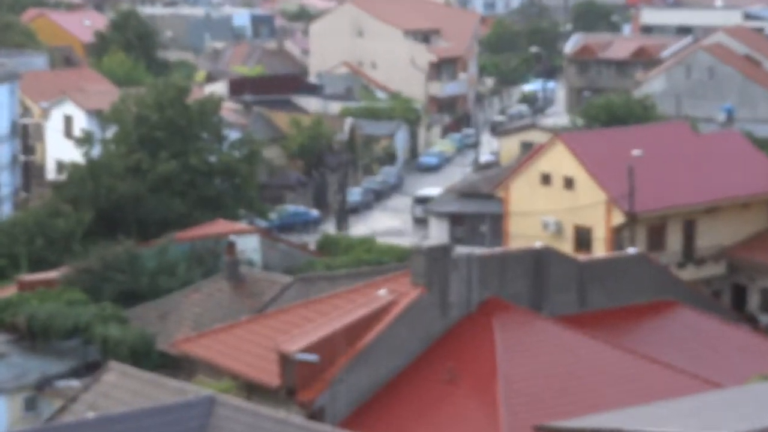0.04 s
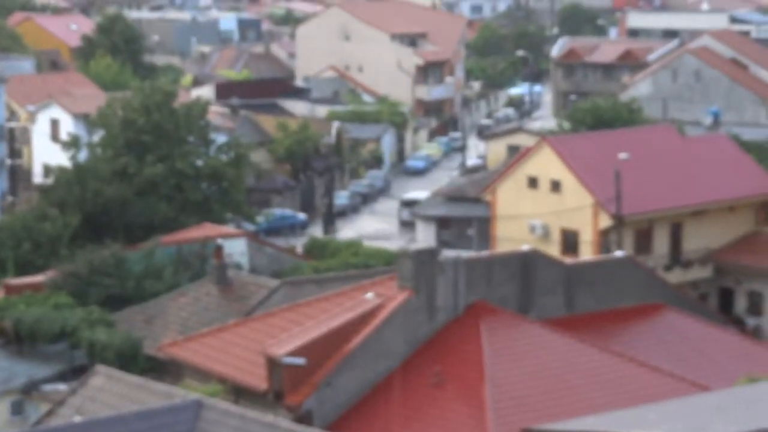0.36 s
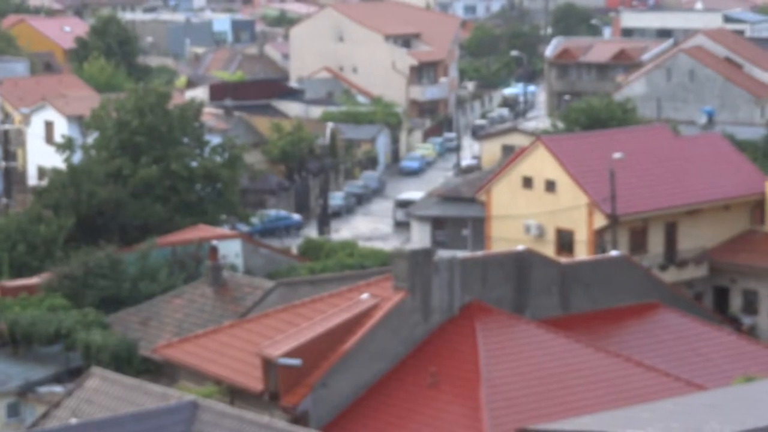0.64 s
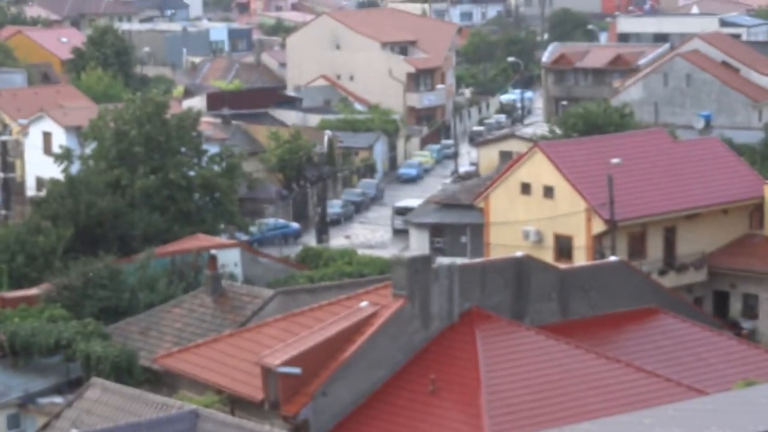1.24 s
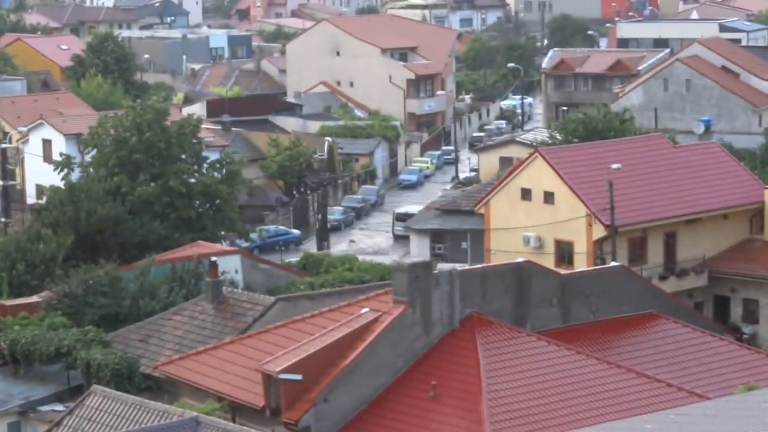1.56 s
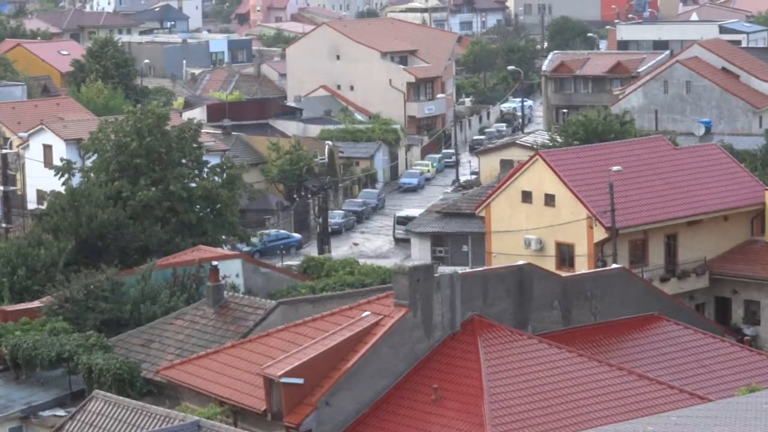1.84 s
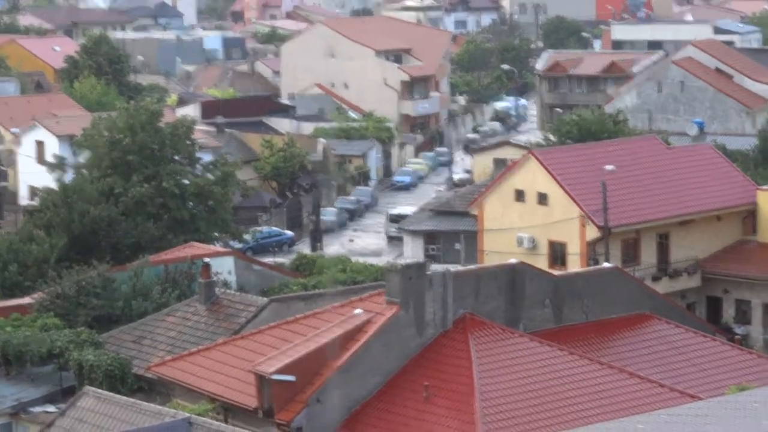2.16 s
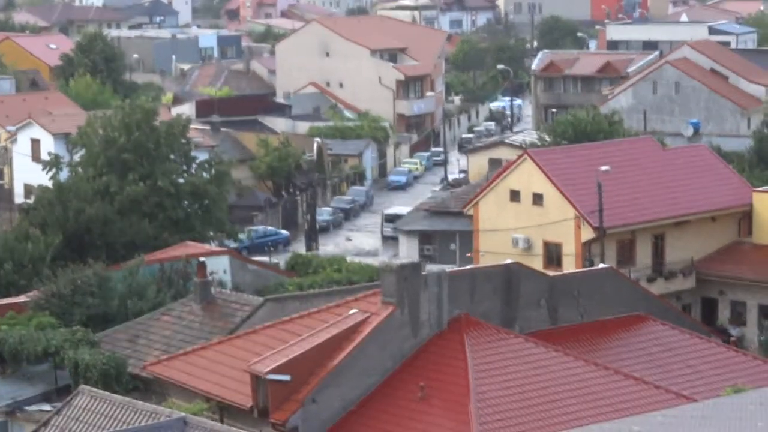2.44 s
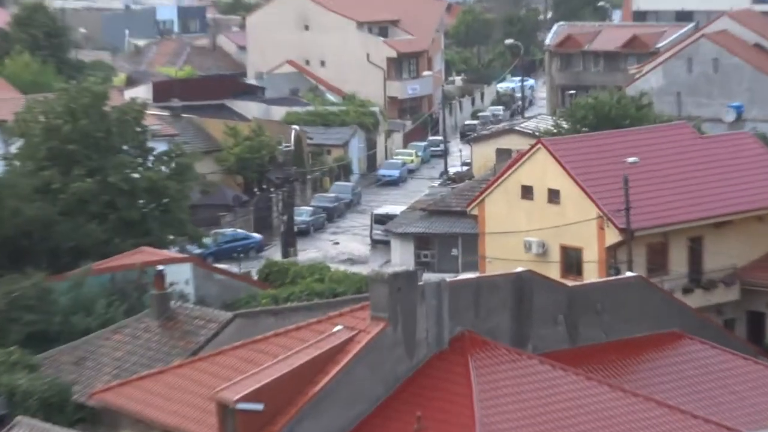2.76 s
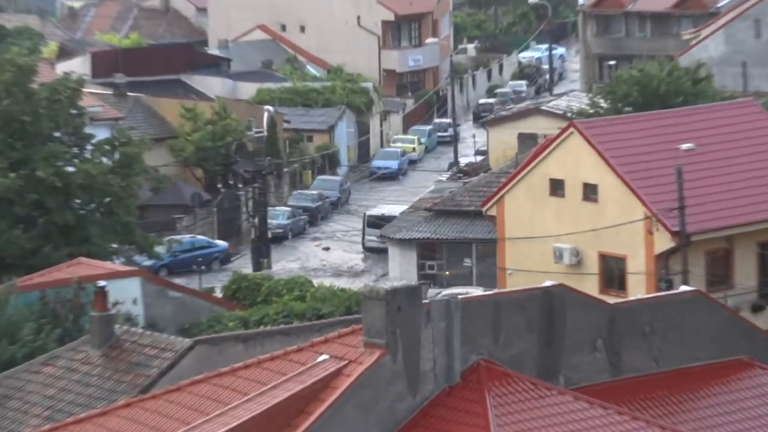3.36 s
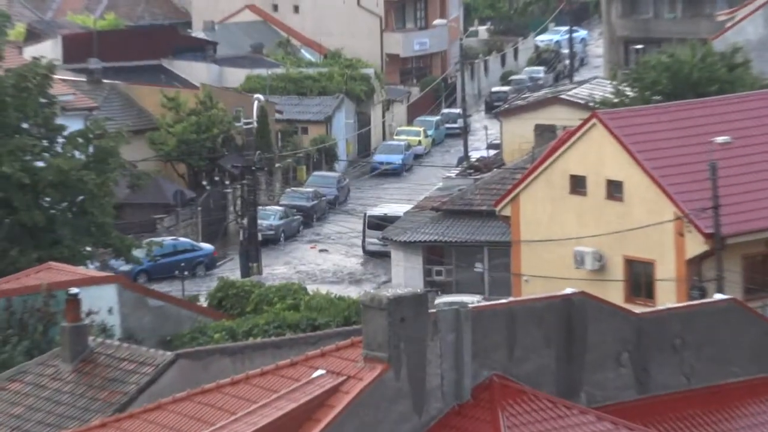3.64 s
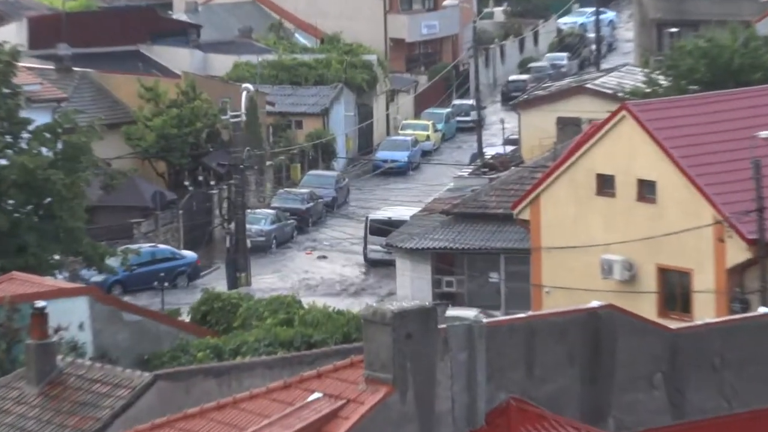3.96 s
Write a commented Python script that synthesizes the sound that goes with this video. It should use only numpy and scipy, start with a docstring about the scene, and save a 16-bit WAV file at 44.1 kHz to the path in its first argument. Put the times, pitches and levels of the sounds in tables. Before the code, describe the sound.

Dense, even rain patters on tiled roofs while nearby drops tick and splash.

```python
"""Rain over town roofs

Steady rain, with the microphone at a high window. Far off, countless drops merge into a wash over a low
town rumble; nearer, they patter on tiles and set a sheet-metal roof ringing faintly, with a few heavy
drips. Now and then a drop bursts on the ledge close by: a tick and a short bright spray.
The house walls give back a short echo of the patter and the splashes."""
import sys
import numpy as np
from scipy import signal
from scipy.fft import rfft, irfft
from scipy.io import wavfile
from scipy.ndimage import uniform_filter1d

SR = 44100
rng = np.random.default_rng(int(sys.argv[2]) if len(sys.argv) > 2 else 0)


def generate_wav(sig):
    """Save sig (samples, or channels by samples) to the path in sys.argv[1] as 16-bit PCM at SR."""
    pcm = np.round(np.clip(np.atleast_2d(sig).T, -1, 1) * 32767).astype(np.int16)
    wavfile.write(sys.argv[1], SR, pcm)


N = 176400

# Tone of the far rain at the window. Each row: frequency in Hz, relative level in dB.
WASH_SPECTRUM = [(20, -12), (45, -9), (100, -3), (150, -2), (230, -4.5), (320, -1.5), (460, -4), (530, 0),
                 (680, -3), (790, -1.5), (930, -3.5), (1230, -2.5), (1420, -5), (1800, -6), (3700, -11.5),
                 (7100, -16), (9200, -19), (11000, -24.5)]
# Slight swells and lulls of the rain over the roofs. Each row: time in seconds, gain in dB.
RAIN_STRENGTH = [(0, 0.46), (.6, 0.47), (.9, 0), (1.2, 0.44), (1.8, 0.1), (2.2, 0.66), (2.7, -.5),
                 (3.15, -0.74), (3.7, 0.6), (4, -0.6)]
# Tone of the nearby tiles. Each row: frequency in Hz, relative gain in dB.
TILE_SPECTRUM = [(100, -23), (500, -2.5), (1200, -1), (2600, 0.5), (5000, -8), (8000, -14.5),
                 (11000, -11.5)]
# Drops on the ledge by the microphone. Each row: start in seconds, tick level in dB, spray level in dB,
# spray decay time in seconds, pitch in Hz.
LEDGE_DROPS = [(.017, -33, -51, .008, 3000), (.074, -34, -33, .012, 8000),
               (0.0806, -31, -31.5, 0.013, 10000), (.1990, -30.5, -43, .014, 3600),
               (.295, -36.5, -48, .008, 5000), (.405, -44, -40, .02, 6000), (.546, -35, -37.5, 0.013, 6000),
               (.579, -38, -38, .012, 9000), (.5830, -31, -30.5, 0.017, 7500),
               (0.661, -43, -50, .006, 6500), (.711, -39, -39, .01, 5500),
               (0.7494, -34, -36.5, 0.017, 6460), (.762, -36, -46, .008, 6000),
               (0.977, -38, -48, .008, 7000), (1.025, -35.5, -43, .008, 7000),
               (1.114, -35, -42, .016, 10400), (1.121, -38, -37, .022, 6450), (1.343, -38, -48, .008, 6000),
               (1.394, -34.5, -45, .006, 8500), (1.633, -40, -40.5, .015, 6500),
               (1.757, -40, -39.5, 0.013, 6000), (1.851, -41, -46, .02, 6000),
               (1.864, -39, -37.5, 0.033, 5200), (2.0522, -30.5, -34, .01, 9100),
               (2.096, -38, -39.5, .016, 9500), (2.655, -35, -37, .02, 6200),
               (3.11, -34.5, -44, .008, 3500), (3.203, -36.5, -40, .008, 6500),
               (3.247, -31.5, -34, 0.024, 8300), (3.659, -40, -44, .01, 6000),
               (3.720, -41, -39.5, 0.027, 9600), (3.917, -37, -39, 0.02, 5000)]
# Modes of the metal roof. Each row: frequency in Hz, relative level in dB, seconds to fall 60 dB.
ROOF_MODES = [(419.6, -11.5, .45), (530, -7, 0.23), (779, -5.5, 0.3), (813.5, -3.5, 0.13), (1003, -9, .14),
              (1243, -13, 0.12)]
# Heavy drips on that roof. Each row: start in seconds, gain on the modes in dB.
ROOF_DRIPS = [(.015, -38.5), (.27, -48), (.54, -34), (.752, -35), (2.10, -41), (2.725, -35.5), (2.93, -32)]
# Echo between the houses. Each row: frequency in Hz, seconds to fall 60 dB.
WALL_DECAY = [(200, 0.18), (2000, 0.34), (10000, .1)]
# Stereo spread at the window. Each row: frequency in Hz, gain of side against mid in dB.
STEREO_WIDTH = [(60, -24), (200, -17.5), (600, -15.5), (1900, -13), (6000, -10.5), (11000, -8)]


def far_rain(level_db=-34, patch_db=.5, flicker_db=.81):
    """Countless distant drops merge into a hiss, with drifting patches and quick flicker in the treble."""
    hz, t, spectrum = signal.stft(rng.standard_normal((2, N)), SR, nperseg=512, noverlap=384)
    patches = uniform_filter1d(rng.standard_normal(spectrum.shape[1:]), size=4, axis=0)
    patches = unit(uniform_filter1d(patches, size=12, axis=1))
    flicker = unit(uniform_filter1d(rng.standard_normal(len(t)), size=6)) * np.sqrt(hz / 5000)[:, None]
    spectrum *= amp(patch_db * patches + flicker_db * flicker)
    hiss = signal.istft(spectrum, SR, nperseg=512, noverlap=384)[1][:, :N]
    return amp(level_db) * unit(stereo(*colour(hiss, WASH_SPECTRUM)))


def tile_patter(per_s=1100, spots=24, decay_cycles=.75, level_db=-42.5, echo_db=-2.5):
    """Drops on nearby tiles: each spot answers with a dead tick of its own pitch."""
    t, ticks = np.arange(512) / SR, np.zeros((2, N))
    for hz in np.geomspace(700, 9000, spots):
        tick = np.exp(-t * hz / decay_cycles) * np.sin(2 * np.pi * hz * t) * hz
        ticks += signal.oaconvolve(impacts(per_s / spots, spread_db=4.5), tick[None], axes=1)[:, :N]
    direct = stereo(*colour(ticks, TILE_SPECTRUM))
    return amp(level_db) * unit(direct + amp(echo_db) * wall_echo(direct))


def ledge_splash(tick_db, spray_db, decay_s, hz, tick_s=.0016, rise_s=.00057, width=.3, size=6000):
    """A drop bursts close up: a wet tick, then a dying, faintly pitched spray over the ledge's knock."""
    t = np.arange(size) / SR
    grains = rng.standard_normal((2, size)) * amp(-1.5 * np.minimum(rng.exponential(1, size), 4))
    tick_env = amp(tick_db) * np.sqrt(t / tick_s) * np.exp(1 - t / tick_s)
    spray_env = amp(spray_db) * (1 - np.exp(-t / rise_s)) * np.exp(-t / decay_s)
    droplets = band(grains, hz, octaves=.88)
    ring = amp(-4.5) * band(rng.standard_normal((2, size)), hz, octaves=.065)
    knock = amp(-8.5) * band(grains, hz=930, octaves=.43)
    mid, side = droplets * np.hypot(tick_env, spray_env) + (ring + knock) * spray_env
    return np.array([mid + width * side, mid - width * side])


def metal_roof(murmur_db=-50.5, drip_detune=.01):
    """Rain keeps the modes of a sheet-metal roof ringing faintly; a few heavy drips stand out."""
    t = np.arange(SR // 2) / SR
    murmur, drips = np.zeros((2, N)), np.zeros((2, N))
    for hz, mode_db, t60 in ROOF_MODES:
        fade = amp(mode_db) * np.exp(-np.log(1000) * t / t60)
        ring = fade * np.sin(2 * np.pi * hz * t)
        murmur += signal.oaconvolve(impacts(per_s=40, spread_db=2.5), ring[None], axes=1)[:, :N]
        for start, drip_db in ROOF_DRIPS:
            drip_hz = hz * (1 + drip_detune * rng.uniform(-1, 1))
            add(drips, start, amp(drip_db) * fade * np.sin(2 * np.pi * drip_hz * t)[None])
    return amp(murmur_db) * unit(stereo(*murmur)) + drips


def wall_echo(sound, size=16384):
    """The house walls return a short diffuse echo, the high treble dying first."""
    hz, t, spectrum = signal.stft(rng.standard_normal((2, size)), SR, nperseg=256)
    fade = amp(-60 * t / read(WALL_DECAY, hz)[:, None])
    tail = signal.istft(spectrum * fade, SR, nperseg=256)[1]
    tail /= np.linalg.norm(tail[0])
    return stereo(*signal.fftconvolve(sound.mean(0)[None], tail, axes=1)[:, :N])


def town_rumble(level_db=-53):
    """The low drone of the town below the window."""
    return amp(level_db) * stereo(*band(rng.standard_normal((2, N)), hz=57, octaves=.1))


def impacts(per_s, spread_db):
    """Random drop hits, many small and few large, each from its own direction, as mid and side."""
    hits = (rng.random(N) < per_s / SR) * rng.choice([-1, 1], N)
    mid = hits * amp(spread_db * np.minimum(rng.exponential(1, N), 4.5))
    side = mid * rng.uniform(-1, 1, N) * np.sqrt(3)  # same power as the mid
    return np.array([mid, side])


def stereo(mid, side):
    """Mid and side to left and right: bass near the centre, treble wider."""
    side = colour(side, STEREO_WIDTH)
    return np.array([mid + side, mid - side])


def amp(db):
    """Decibels to gain."""
    return 10 ** (np.asarray(db) / 20)


def unit(x):
    """Scales to rms 1."""
    return x / np.sqrt(np.mean(x ** 2) + 1e-20)


def read(points, hz):
    """Reads a table on a log-frequency axis."""
    f, value = np.transpose(points)
    return np.interp(np.log(hz + 1), np.log(f + 1), value)


def add(mix, start, sound):
    """Mixes a sound in at a start time in seconds."""
    part = mix[:, max(round(start * SR), 0):][:, :sound.shape[1]]
    part += sound[:, :part.shape[1]]


def colour(x, points):
    """Filters by a table of dB over frequency."""
    return irfft(rfft(x) * amp(read(points, np.fft.rfftfreq(N, 1 / SR))), N)


def band(x, hz, octaves):
    """A bell-shaped band around hz, at rms 1."""
    f = np.fft.rfftfreq(x.shape[-1], 1 / SR)
    bell = np.exp(-.5 * (np.log2((f + 1) / hz) / octaves) ** 2)
    return unit(irfft(rfft(x) * bell, x.shape[-1]))


def scene(splash_echo_db=-12.5):
    """At the window: rain on roofs far and near, splashes close up, the town behind."""
    splashes = np.zeros((2, N))
    for start, *drop in LEDGE_DROPS:
        add(splashes, start, ledge_splash(*drop))
    strength = amp(np.interp(np.arange(N) / SR, *np.transpose(RAIN_STRENGTH)))
    rain = strength * (far_rain() + tile_patter() + metal_roof())
    return rain + splashes + amp(splash_echo_db) * wall_echo(splashes) + town_rumble()


def record(dry):
    """The recorder cuts off the treble above about 11 kHz."""
    lowpass = signal.firwin(601, cutoff=11120, window=("kaiser", 9), fs=SR)
    return signal.oaconvolve(dry, lowpass[None], "same")


dry = scene()
out = record(dry)
generate_wav(out)
```